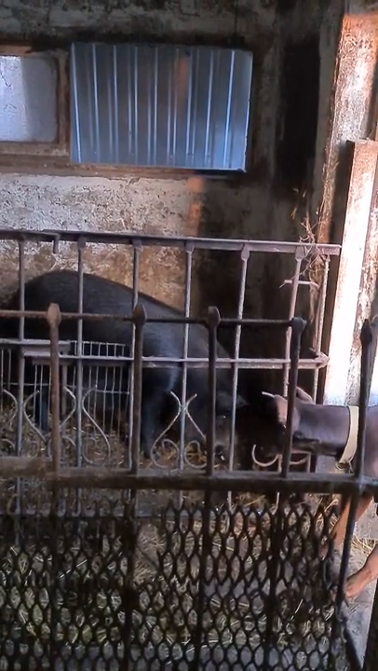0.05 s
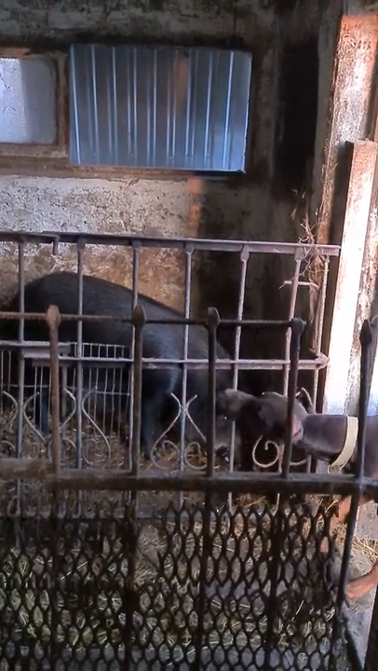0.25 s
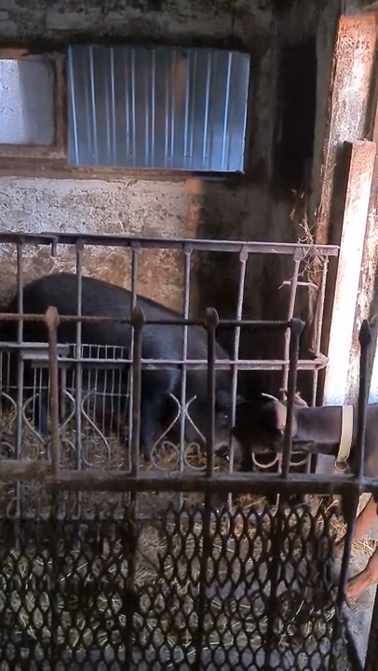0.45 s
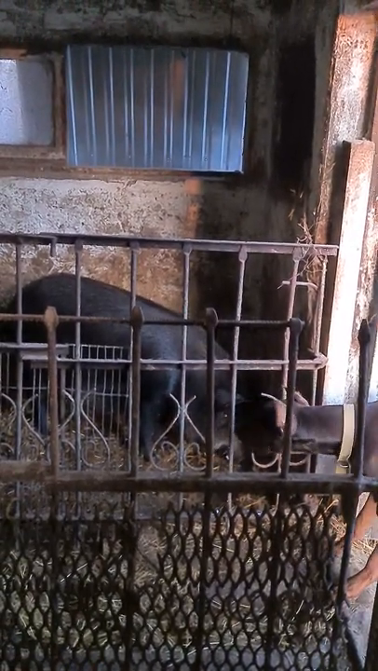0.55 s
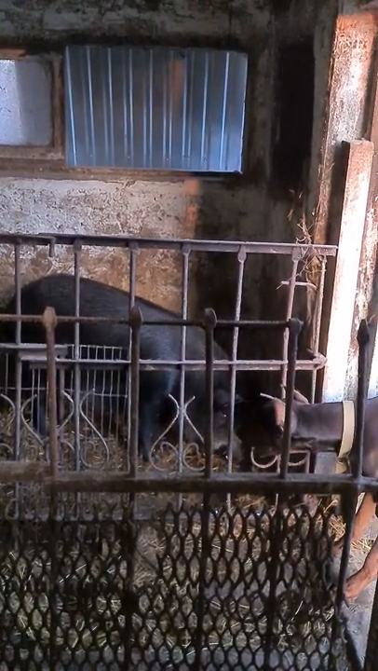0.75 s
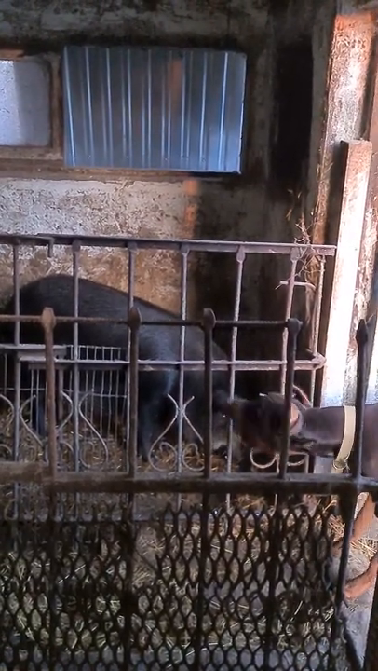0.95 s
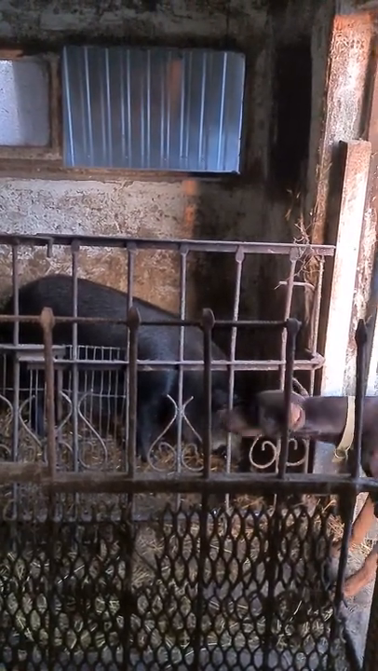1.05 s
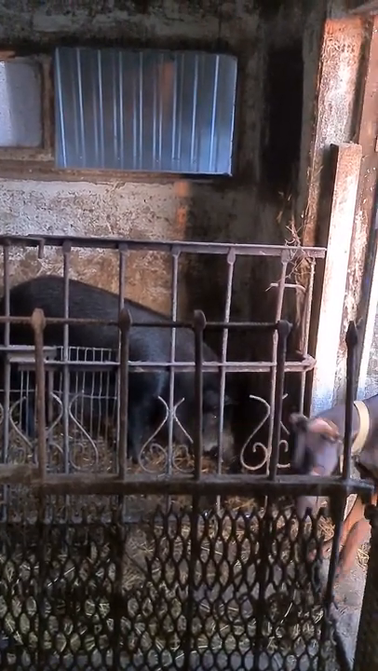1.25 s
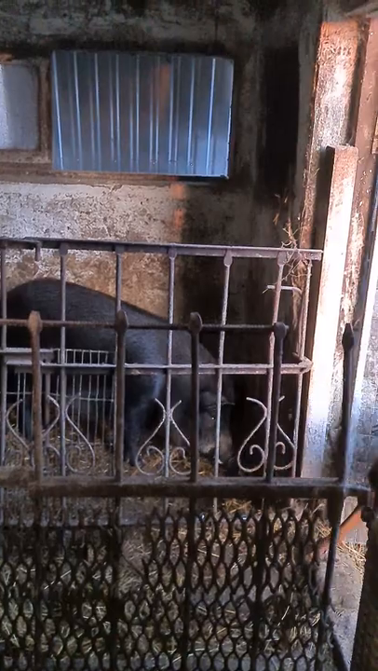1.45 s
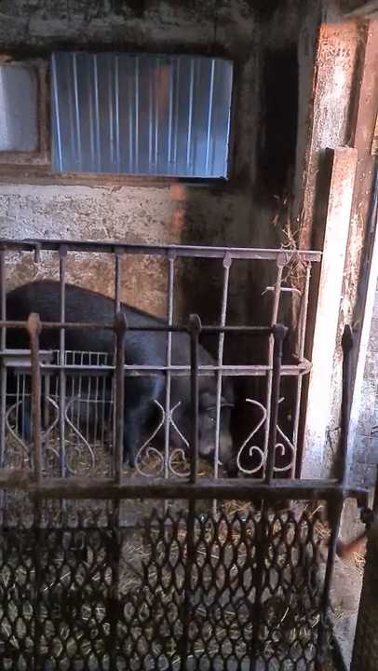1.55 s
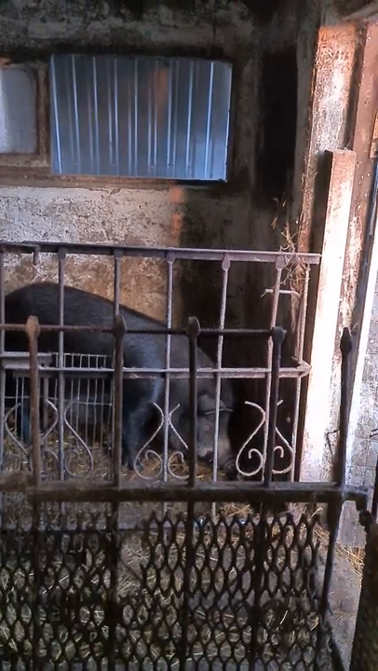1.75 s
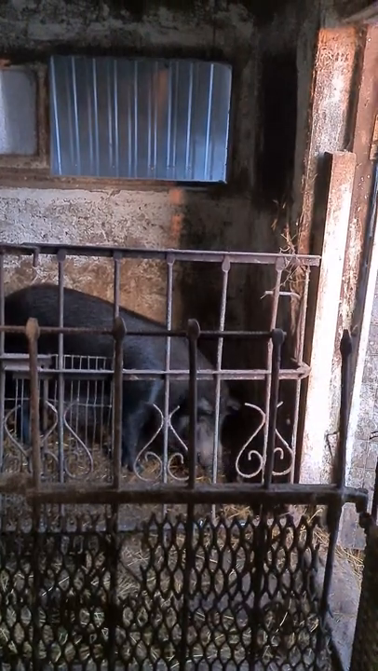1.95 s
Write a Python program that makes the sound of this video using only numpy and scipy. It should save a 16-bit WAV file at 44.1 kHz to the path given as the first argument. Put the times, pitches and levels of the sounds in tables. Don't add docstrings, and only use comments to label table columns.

```python
import sys
import numpy as np
from scipy import signal
from scipy.io import wavfile
from scipy.ndimage import uniform_filter1d, minimum_filter1d

SR = 44100
rng = np.random.default_rng(int(sys.argv[2]) if len(sys.argv) > 2 else 0)


def dump_mix(stems):
    frames = np.atleast_2d(stems).T
    limited = np.clip(frames, -1, 1)
    pcm = np.round(limited * 32767).astype(np.int16)
    wavfile.write(sys.argv[1], SR, pcm)


def elevation(decibels):
    levels = np.asarray(decibels, float)
    return 10 ** (levels / 20)


N = 85995

HUM_HZ = [50, 82, 163, 212, 325]
# (width [Hz], level [dB])
HUM_LINES = [(16, -54), (5.9, -47), (30, -56), (5.1, -66), (2.7, -55)]
# (frequency [Hz], density [dB per Hz])
YARD_SPECTRUM = [(35, -8), (60, -17.5), (110, -8), (200, -11), (260, -18.5), (630, -14), (1200, -18.5),
                 (2600, -32.5)]
# (frequency [Hz], density [dB per Hz])
HISS_SPECTRUM = [(1180, -12.5), (2000, -4.5), (3250, -3.5), (3610, -1), (4980, -6.5), (6740, -0.5),
                 (8980, -14), (13600, -1), (15900, -12)]
# (frequency [Hz], likeness [0-1])
BACKGROUND_LIKENESS = [(60, 0.99), (160, 0.88), (300, 0.74), (600, .6), (1600, .55), (4000, 0.12),
                       (8000, 0.0086)]
# (frequency [Hz], left minus right [dB])
BACKGROUND_BALANCE = [(60, 2.5), (300, -2), (1000, -1.5), (3300, -3), (5500, -8), (9000, -2),
                      (15000, -18.5)]
# (time [s], level [dB])
STIR = [
    (0, -5),
    (0.902, -2.5),
    (1.5, -0.5),
    (1.651, 1.5),
    (1.75, 0.5),
    (1.95, 3),
]
# (frequency [Hz], T60 [s])
SHED_T60 = [(250, 0.58), (480, 0.28), (1000, 0.32), (2000, 0.24), (4000, 0.46), (10000, .15)]
# (frequency [Hz], likeness [0-1])
SHED_LIKENESS = [(250, 0.69), (500, 0.7), (800, 0.5), (2000, 0.053)]
# (delay [s], left [dB], right [dB])
WALLS = [
    (.016, -6, -13.5),
    (.024, -11.5, -10.5),
    (.033, -6.5, -9),
    (.045, -14, -5),
]
# (start [s], rise [s], hold [s], fall [s], level [dB])
PUFFS = [
    (0.205, 0.032, 0.068, 0.092, -34),
    (0.926, 0.047, 0.087, 0.058, -31),
]
# (frequency [Hz], density [dB per Hz])
PUFF_SPECTRUM = [(1530, -43), (2600, -19), (3800, -13), (5070, -3.5), (6410, -3), (7750, -18), (9160, -13),
                 (12000, -3), (15900, -11.5)]
# (frequency [Hz], left minus right [dB])
PUFF_BALANCE = [(2600, -10.5), (5500, -13.5), (9000, -20), (15000, -35.5)]
# (start [s], length [s], pitch [Hz], level [dB])
GRUNTS = [
    (0.328, 0.048, 204.9, -38.5),
    (1.073, 0.046, 202, -48),
]
# (time [s], effort [dB], tone [Hz], mouth overtones [dB], rattle pitch [Hz], roughness [0-1])
BARK_A = [
    (.196, -26, 547, -39, 551.7, 0),
    (.212, -4.5, 562, -20.5, 555, 0),
    (.23, -11.5, 559, 4.5, 550.2, 0),
    (.241, -10.5, 541.5, 3, 595.4, 0.3),
    (.25, -9, 486, -0.5, 562.5, 0.2),
    (.28, -16, 477.4, -14, 575.2, 0),
    (.305, -11, 488.8, 0, 519.2, 0.4),
    (.325, -24, 430, -2, 448.2, 0.23),
    (.35, -31.5, 424, 7, 419, 0.3),
]
# (time [s], effort [dB], tone [Hz], mouth overtones [dB], rattle pitch [Hz], roughness [0-1])
BARK_B = [
    (.914, -45.5, 470, -39, 469.7, 0),
    (.928, -14.5, 489, -14, 495, 0),
    (.942, -1.5, 565, -16, 547, 0.12),
    (.966, -5.5, 561.4, -1, 555.8, 0),
    (.984, -10, 546, 1, 581.8, 0.27),
    (1.002, -6, 498, -5, 570.4, 0.35),
    (1.03, -13, 490.6, -1.5, 558.2, 0.41),
    (1.055, -21.5, 473.7, -3.5, 451.2, 0.13),
    (1.085, -16.5, 460, -3, 443, 0.095),
]
# (frequency [Hz], width [Hz], level [dB])
THROAT = [(757, 137, 0), (1064, 392, -4), (1416, 250, 2), (1647, 227, 1.5), (1970, 253, -7),
          (2149, 135, -5), (2840, 410, -28)]
# (multiple of tone, level [dB])
CLOSED_OVERTONES = [(2, -23), (3, -22), (4, -20), (5, -38.5), (9, -36.5)]

YARD_DB, HISS_DB, HUM_WAVER = -47.5, -45, 0.45
SHED_DB, DOG_LEFT_DB, EAR_GAP_S = -5.5, -1.5, 0.0004
PUFF_TAIL_DB, PUFF_TAIL_S = -7.5, 0.05
CHEST_HZ, CHEST_WIDTH_HZ, CHEST_DB = 390, 40, -36
RISE_S, CLOSE_S = 0.0032, 0.014
BREAK_S = 0.0099
HALF_PITCH, RASP, RATTLE_WOBBLE, TONE_WOBBLE = 0.35, 5, 0.03, 0.032
HUSK, HUSK_WIDTH_HZ = 0.42, 104.5
THROAT_WIDEN, FLUTTER_DB = 1.7, 4
CLOSING_DB_PER_OCTAVE, CLOSING_PIVOT_HZ = -12.5, 1230
BASS_DUCK, CEILING = 0.18, 0.99


def evened(x):
    return x / np.sqrt(np.mean(x ** 2) + 1e-20)


def smoothed(x, size):
    return uniform_filter1d(uniform_filter1d(x, size=size), size=size)


def read(points, hz):
    f, value = np.transpose(points)
    return np.interp(np.log(hz + 1), np.log(f + 1), value)


def resonate(x, hz, width_hz):
    turn = np.exp(2j * np.pi * np.cumsum(hz * np.ones(len(x))) / SR)
    r = np.exp(-np.pi * width_hz / SR)
    return 2 * (turn * signal.lfilter([1 - r], [1, -r], x / turn + 1e-18)).real


def resonate_twice(x, hz, width_hz):
    return resonate(resonate(x, hz, width_hz), hz, width_hz)


def noise(spectrum, likeness, balance, patchy_db, size):
    frames, hz = 4 * N // size + 5, np.fft.rfftfreq(size, 1 / SR)
    a, b, c, d, patches = rng.standard_normal((5, len(hz), frames))
    patches = uniform_filter1d(patches, size=size // 64, axis=0)
    patches = evened(uniform_filter1d(patches, size=8192 // size, axis=1))
    same, left = np.clip(read(likeness, hz), -1, 1)[:, None], a + 1j * b
    z = np.array([left, same * left + np.sqrt(1 - same ** 2) * (c + 1j * d)])
    tilt = elevation(read(balance, hz))[:, None]
    z *= np.array([tilt, tilt ** 0]) / np.sqrt(1 + tilt ** 2)
    inside = ((hz >= spectrum[0][0]) & (hz <= 1.02 * spectrum[-1][0]))[:, None]
    z = z * inside * elevation(read(spectrum, hz)[:, None] + patchy_db * patches)
    x = signal.istft(z, nperseg=size, noverlap=3 * size // 4)[1][:, :N]
    return x / np.sqrt(np.mean(x.mean(0) ** 2))


def hum():
    t = np.arange(N) / SR
    total = np.zeros(N)
    for hz, (width_hz, db) in zip(HUM_HZ, HUM_LINES):
        waver = evened(resonate_twice(rng.standard_normal(N), hz, width_hz))
        total += elevation(db) * evened(HUM_WAVER * waver + np.sin(2 * np.pi * hz * t))
    return total


def yard():
    stir = elevation(np.interp(np.arange(N) / SR, *np.transpose(STIR)))
    murmur = noise(YARD_SPECTRUM, BACKGROUND_LIKENESS, BACKGROUND_BALANCE, patchy_db=3.3, size=2048)
    hiss = noise(HISS_SPECTRUM, BACKGROUND_LIKENESS, BACKGROUND_BALANCE, patchy_db=-0.7, size=512)
    return stir * (elevation(YARD_DB) * murmur + hum()) + stir ** 0.99 * elevation(HISS_DB) * hiss


def shed(x):
    taps = np.zeros((2, SR))
    at = np.arange(900, SR - 20, 20) + rng.integers(0, 20, (2, (SR - 901) // 20))
    np.put_along_axis(taps, at, rng.choice([-1., 1.], at.shape), 1)
    hz, t, z = signal.stft(taps, SR, nperseg=256)
    same = np.clip(read(SHED_LIKENESS, hz), 0, 1)[:, None]
    z = np.array([z[0], same * z[0] + np.sqrt(1 - same ** 2) * z[1]])
    decay = elevation(-60 * t / read(SHED_T60, hz)[:, None])
    tail = signal.istft(z * decay, SR, nperseg=256)[1]
    tail = elevation(SHED_DB) * tail / np.linalg.norm(tail[0])
    for k, (delay_s, left_db, right_db) in enumerate(WALLS):
        tail[0, round(delay_s * SR)] += elevation(left_db)
        tail[1, round((delay_s + (-1) ** k * EAR_GAP_S) * SR)] += elevation(right_db)
    return signal.fftconvolve(x[None], tail, axes=1)[:, :N]


def puff_shape(hold_scale):
    t = np.arange(N) / SR
    total = np.zeros(N)
    for start_s, rise_s, hold_s, fall_s, db in PUFFS:
        up = np.clip((t - start_s) / rise_s, 0, 1)
        down = np.clip(1 - (t - start_s - rise_s - hold_scale * hold_s) / fall_s, 0, 1)
        total += elevation(db) * (up * down) ** 2
    return total


def breath():
    air = noise(PUFF_SPECTRUM, [(1000, 0.11), (9000, 0.02)], PUFF_BALANCE, patchy_db=2.0, size=512)
    low = signal.sosfilt(signal.butter(4, 7500, fs=SR, output="sos"), air)
    top = signal.sosfilt(signal.butter(4, 7500, "high", fs=SR, output="sos"), air)
    r = np.exp(-1 / (PUFF_TAIL_S * SR))
    linger = elevation(PUFF_TAIL_DB) * signal.lfilter([1 - r], [1, -r], puff_shape(0.73))
    return (puff_shape(0.68) + linger) * low + puff_shape(0.7) * top


def grunt(start_s, length_s, pitch_hz, db):
    u = np.clip((np.arange(N) / SR - start_s) / length_s, 0, 1)
    turn = 2 * np.pi * np.cumsum(pitch_hz * (1 - 0.051 * u)) / SR
    pulses = np.sin(turn) + np.sin(3 * turn / 2) + 0.76 * np.sin(2 * turn)
    return elevation(db) * np.sin(np.pi * u) ** 2 * pulses


def rattle(turns, rough, broken):
    whole = sum(np.cos(2 * np.pi * k * turns) for k in range(2, 7))
    halves = sum(np.cos(2 * np.pi * (k + 0.5) * turns) for k in range(6))
    bursts = 0.9 + np.exp(-(turns / 2 % 1) / 0.3)
    rasp = RASP * rough * rng.standard_normal(N) * bursts
    return (1 - rough) * (whole + 2 * HALF_PITCH * broken * halves) + rasp


def throat(drive, shut):
    total = np.zeros(N)
    for k, (hz, width_hz, db) in enumerate(THROAT):
        flutter = smoothed(rng.standard_normal(N), 400) * np.sqrt(600)
        closing_db = shut * CLOSING_DB_PER_OCTAVE * np.log2(hz / CLOSING_PIVOT_HZ)
        gain = (-1) ** k * elevation(db + FLUTTER_DB * flutter + closing_db)
        total += gain * resonate_twice(drive, hz, THROAT_WIDEN * width_hz)
    return total


def bark(rows):
    s, effort_db, tone_hz, mouth_db, rattle_hz, rough = np.transpose(rows)
    t = np.arange(N) / SR

    def curve(values):
        return np.interp(t, s, values)

    broken = np.clip((t - s[1] - BREAK_S) / 0.02, 0, 1)
    shut = np.clip((t - s[0]) / (s[-1] - s[0]), 0, 1) ** 1.5
    shake, sway = [broken * evened(smoothed(x, 150)) for x in rng.standard_normal((2, N))]
    phase = 2 * np.pi * np.cumsum(curve(tone_hz) * (1 + TONE_WOBBLE * sway)) / SR
    turns = np.cumsum(curve(rattle_hz) * (1 + RATTLE_WOBBLE * shake)) / SR

    drive = rattle(turns, np.clip(curve(rough), 0, 1), broken)
    mouth = elevation(curve(mouth_db)) * (0.19 + 0.45 * broken) * throat(drive, shut)
    chest = elevation(CHEST_DB) * resonate_twice(drive, CHEST_HZ, CHEST_WIDTH_HZ)

    husk = resonate(rng.standard_normal(N), 0.946 * curve(tone_hz), HUSK_WIDTH_HZ)
    husk = HUSK * broken * evened(resonate(husk, 0.974 * curve(tone_hz), HUSK_WIDTH_HZ))

    overtones = sum(elevation(db) * np.sin(round(k) * phase) for k, db in CLOSED_OVERTONES)
    closed = (1 - broken) * elevation(0.73 * (curve(effort_db) - effort_db.max())) * overtones
    shape = np.clip((t - s[0]) / RISE_S, 0, 1) ** 2 * np.clip(1 - (t - s[-1]) / CLOSE_S, 0, 1) ** 2
    voice = np.sqrt(2) * np.sin(phase) + husk + closed + mouth + chest
    return shape * elevation(curve(effort_db)) * voice


def scene():
    dog = elevation(5.0) * (bark(BARK_A) + bark(BARK_B) + sum(grunt(*row) for row in GRUNTS))
    direct = dog * elevation([[DOG_LEFT_DB], [0]])
    return direct + shed(dog) + elevation(6.0) * breath() + yard()


def low_pass(x):
    return signal.sosfilt(signal.butter(12, 16080, fs=SR, output="sos"), x)


def record(dry):
    dry = signal.sosfilt(signal.butter(3, 38, "high", fs=SR, output="sos"), dry)
    power_db = 10 * np.log10(abs(uniform_filter1d((dry ** 2).mean(0), size=400)) + 1e-12)
    recovery_db = np.arange(N) * 18.5 / SR
    held_db = np.maximum.accumulate(power_db + recovery_db) - recovery_db
    over_db = np.maximum(held_db + 18.5, 0)
    lag = np.exp(-1 / (0.016 * SR))
    cut_db = 0.5 * signal.lfilter([1 - lag], [1, -lag], over_db)
    bass = signal.sosfiltfilt(signal.butter(2, 130, fs=SR, output="sos"), dry)
    ducked = (dry - bass + bass / elevation(BASS_DUCK * cut_db)) / elevation(cut_db)
    headroom = np.minimum(CEILING / (abs(ducked).max(0) + 1e-9), 1)
    limit = uniform_filter1d(minimum_filter1d(headroom, size=600), size=500)
    return low_pass(ducked * limit)


dry = scene()
out = record(dry)
dump_mix(out)
```